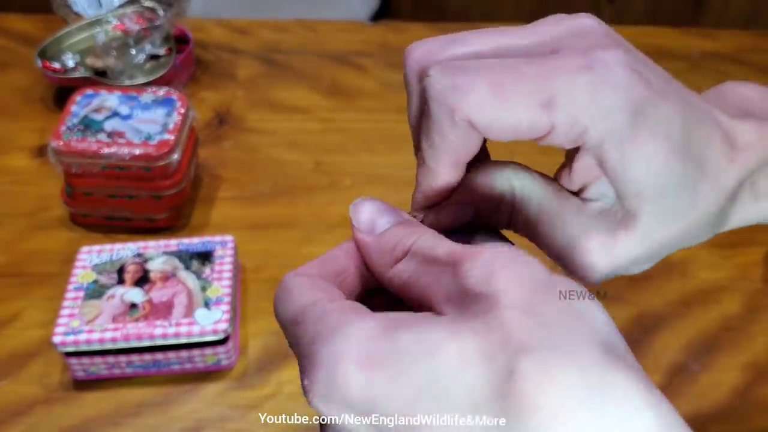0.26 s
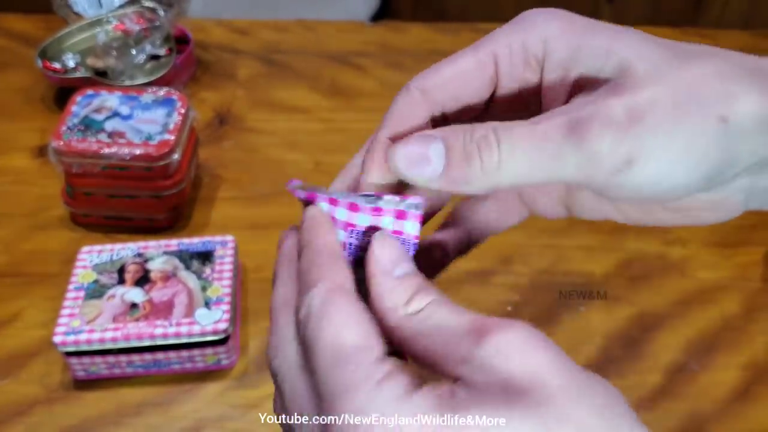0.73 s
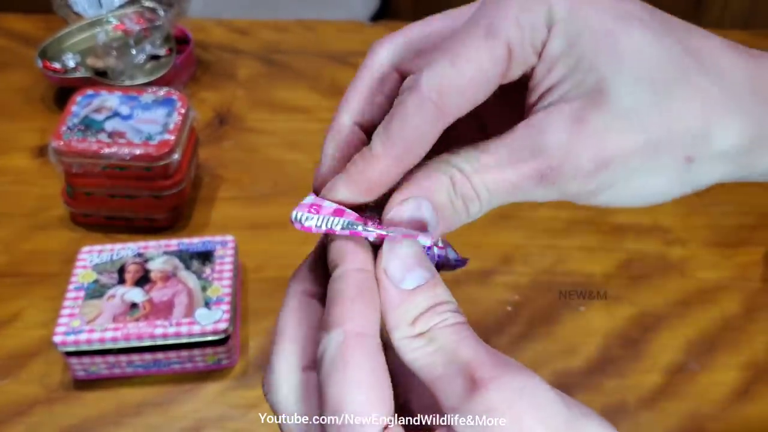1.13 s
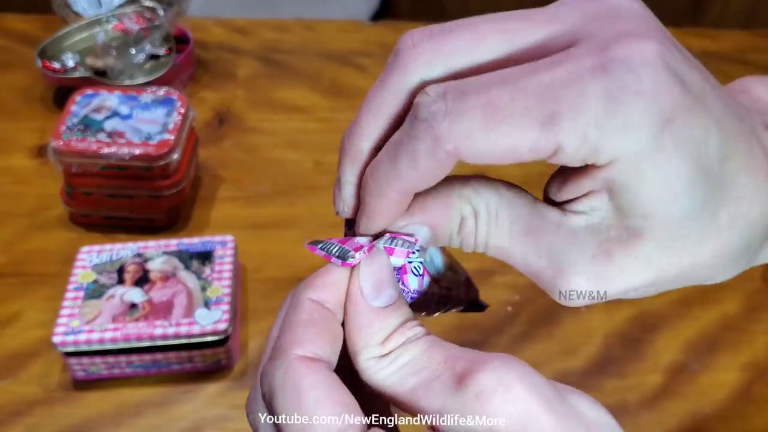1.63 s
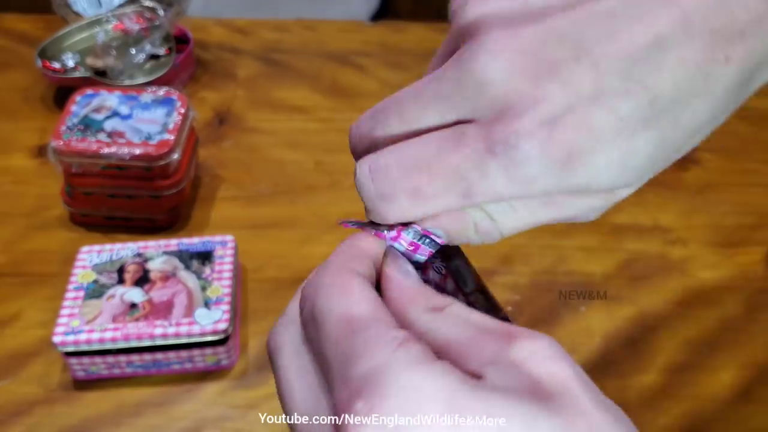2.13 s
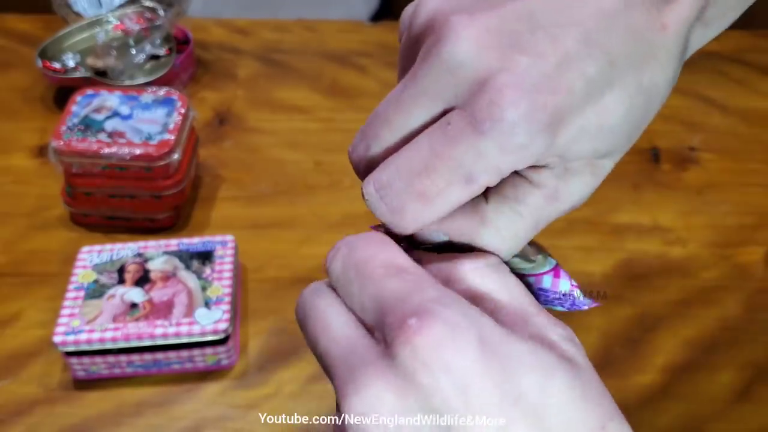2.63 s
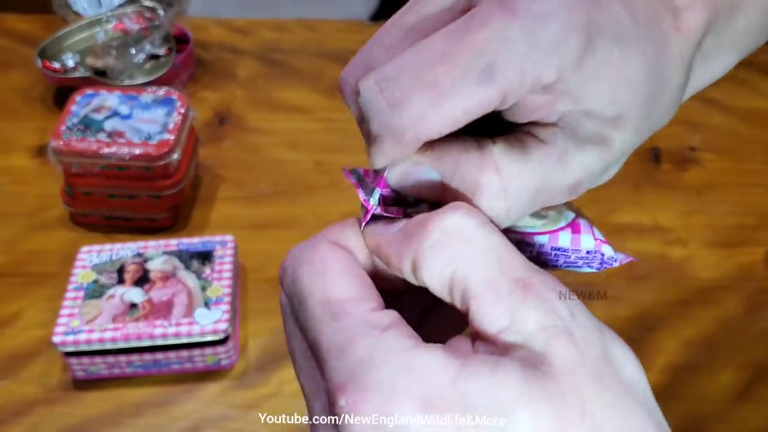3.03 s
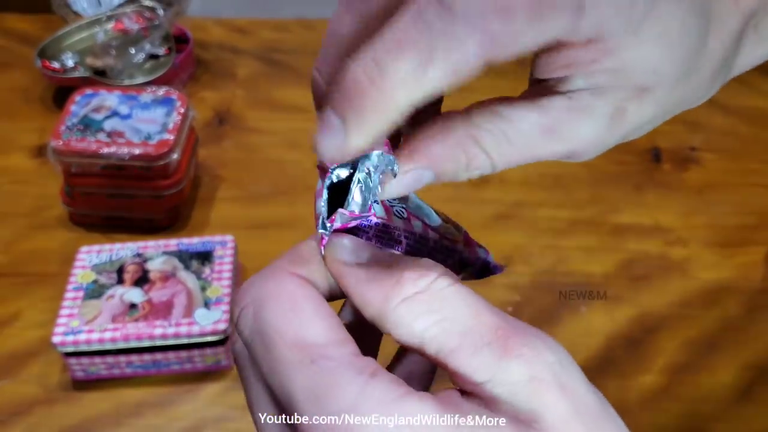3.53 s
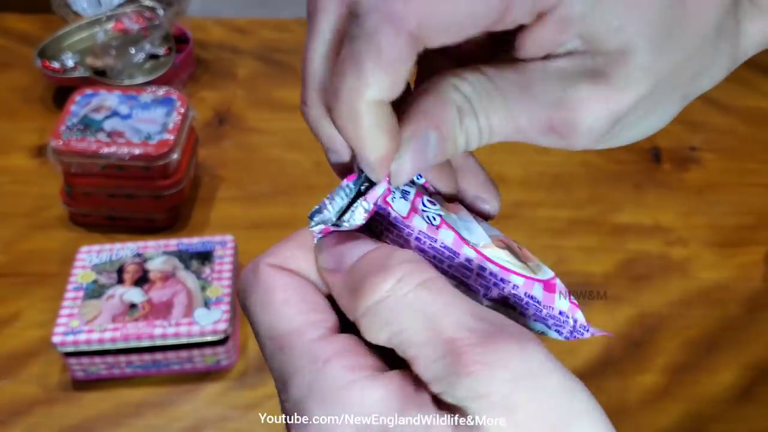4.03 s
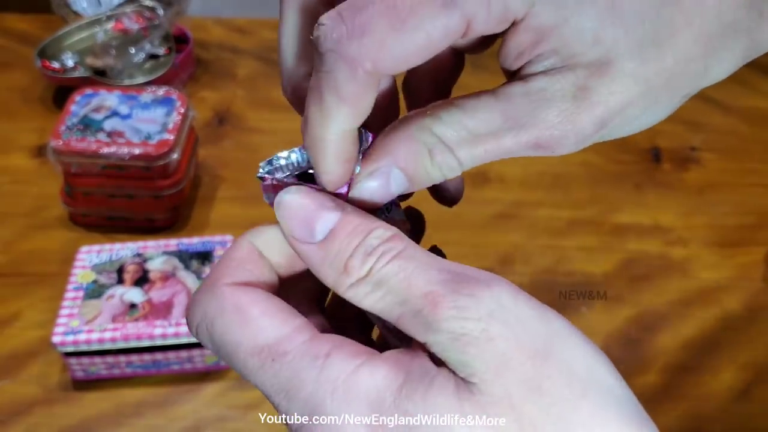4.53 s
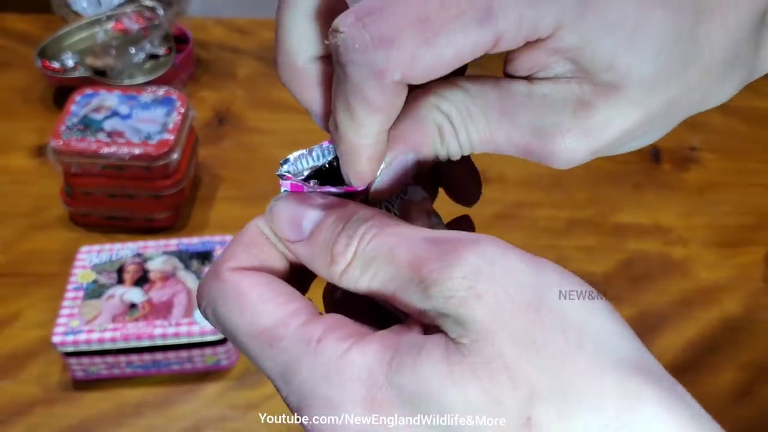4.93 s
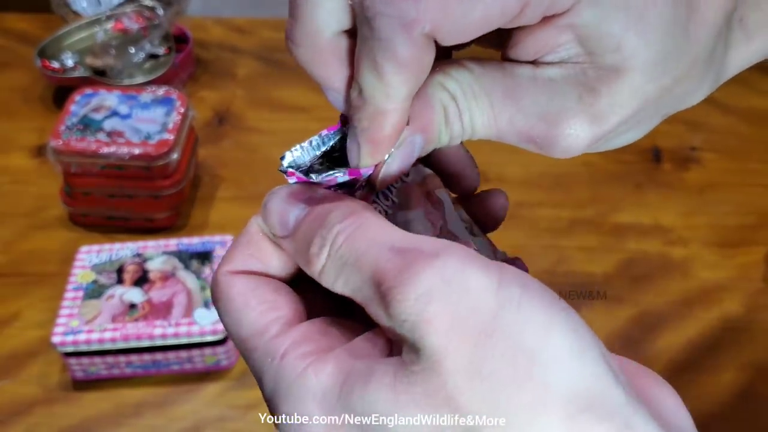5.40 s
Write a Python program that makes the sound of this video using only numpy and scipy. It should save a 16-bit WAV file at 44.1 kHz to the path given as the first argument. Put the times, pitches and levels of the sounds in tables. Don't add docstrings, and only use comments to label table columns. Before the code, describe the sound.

Fingers handle a stiff foil-lined wrapper very close to a stereo microphone, slightly right of centre, in a small quiet room. A sharp snap opens at 0 s, followed by sparse light crackles and a soft press near 0.4. From 0.5 to 1.8 s crisp, dry crinkles come thick and uneven, with papery rustling and fizzing foil between. From 1.9 to 2.7 s they thin into separate pinching snaps with small gaps. A short rip grows near 2.7, a hard snap lands at 3.0, and the loudest dense tear bursts at about 3.1 with a dull thump. Strong crackles continue to 3.3, then sparser ones; a quick peeling flurry runs from 3.9 to 4.2. Lighter picking follows, with a bright snap at 5.2, a tiny seam creak at 5.3 to 5.4 and faint pricks until 5.65. Low mains hum and air noise stay faint; a distant motor drone fades by 4 s.

```python
import sys
import numpy as np
from scipy import signal
from scipy.fft import rfft, irfft, next_fast_len
from scipy.io import wavfile
from scipy.ndimage import uniform_filter1d, map_coordinates

SR = 44100
rng = np.random.default_rng(int(sys.argv[2]) if len(sys.argv) > 2 else 0)


def dump(signal):
    limited = np.clip(np.atleast_2d(signal).T, -1, 1)
    pcm = np.round(limited * 32767).astype(np.int16)
    wavfile.write(sys.argv[1], SR, pcm)


def linear_from_db(decibels):
    return 10 ** (np.asarray(decibels, float) / 20)


N = 249606

# t/s, ring level/dB, body re ring/dB, edge re ring/dB
GRIPPING = [(0.0034, -6.5, -13, -19), (0.0359, -26.5, -14.5, -14), (0.161, -32, -14.5, -11),
            (0.2144, -28.5, -18, -23), (0.2289, -26, -12, -4), (0.2391, -22.5, -22, -8),
            (0.2647, -20.5, -32, -6.5), (0.3861, -31, -10, 6), (0.4119, -26, -3.5, -9),
            (0.427, -9.5, -16, -14.5), (0.478, -28, -4, -30), (0.4941, -28, -7, -6), (0.5028, -17, -21, -4),
            (0.5108, -22.5, 0.5, 5), (0.5316, -13, -39, -7.5), (0.633, -13.5, -18, -13),
            (0.651, -21, -5.5, -3.5), (0.664, -14.5, -31, -10), (0.7165, -22, -33, -6),
            (0.742, -23, -9, -28), (0.7656, -14.5, -18, -15), (0.8003, -16.5, -13, -12),
            (0.852, -11, -18.5, -10), (0.8908, -19, -11.5, -16), (0.9189, -13.5, -17, -9.5),
            (0.9608, -13, -17, -4), (0.9703, -19, -5, -11), (0.9835, -15, -25, -22),
            (0.991, -19.5, -12, 4.5)]
TURNING = [(1.052, -18.5, -18, -6), (1.0714, -18, -14, -15), (1.0894, -10, -19, -11),
           (1.1216, -37.5, -3.5, 13.5), (1.161, -11.5, -23.5, -16), (1.2045, -19, -19, -4),
           (1.265, -24.5, -18, -12), (1.293, -19.5, -28, -33), (1.348, -16.5, -26.5, -17),
           (1.4078, -24.5, -24, -13.5), (1.4194, -31.5, -3, -14), (1.4331, -16.5, -20.5, -14),
           (1.4426, -20.5, -5.5, -11), (1.4587, -18, -13, -29), (1.475, -21, -28, -28),
           (1.532, -14, -35, -26), (1.5422, -14, -47, -5), (1.594, -11, -20.5, -15),
           (1.6218, -13.5, -36, -9.5), (1.6345, -11.5, -17.5, -11.5), (1.6886, -13, -31, -11),
           (1.6942, -10.5, -21.5, -4.5), (1.7762, -44.5, -1, 8.5), (1.784, -23.5, -26, -12)]
PINCHING = [(1.8971, -33, -2, 9.5), (1.926, -18, -2, -8), (1.9726, -17, -13, -32),
            (1.9924, -10, -53, -12.5), (2.0396, -21.5, -14.5, -29), (2.1305, -13, -23, -12),
            (2.166, -18, -8, -29), (2.1811, -16, -26, -27), (2.271, -35.5, -1.5, 11),
            (2.3081, -13, -21, -9.5), (2.315, -25, -33, 1), (2.423, -30, -20, -24),
            (2.4798, -28.5, -34, -18), (2.606, -35.5, -45, -8), (2.713, -20.5, -47, -17),
            (2.7323, -13.5, -15, -41), (2.738, -16.5, -44, -15), (2.7451, -9.5, -18, -23),
            (2.817, -10.5, -51, -8.5), (2.854, -12.5, -19, -6.5), (2.944, -36, -32, 12),
            (2.959, -25, -24, 1), (2.9746, -36, -33, 7.5), (2.989, -40.5, -26, 13), (2.998, -6, -32, -12)]
TEARING = [(3.0588, -22, -25, -6.5), (3.0764, -22, -11, -18), (3.0974, -15, -10, -3), (3.107, -12, -6, -12),
           (3.1166, -5.5, -21, -31), (3.1238, -7.5, -18, -10), (3.1272, -11, -11, -18),
           (3.1526, -7.5, -22, -11.5), (3.1951, -9, -19, -10.5), (3.23, -43.5, -4, 21.5),
           (3.2558, -8, -12.5, -13.5), (3.264, -12.5, -42, -7.5), (3.3368, -16.5, -18, -10),
           (3.394, -14, -27, -12.5), (3.4148, -19, -34, -15), (3.454, -24, -11.5, -6.5),
           (3.473, -19, -28, -8), (3.521, -30.5, -10, -17), (3.6154, -16.5, -6.5, -14.5),
           (3.6853, -25, -7, -26), (3.704, -24.5, 0, -7.5), (3.7903, -24, -10, -7), (3.816, -24, -24, -9.5),
           (3.826, -20, -45, -15), (3.8631, -20.5, -45, -8), (3.8754, -16, -41, -15),
           (3.887, -23.5, -13.5, 6.5)]
PEELING = [(3.913, -23, -4, -27), (3.923, -19, -40, -9), (3.93, -17.5, -26, -6.5),
           (3.9367, -14.5, -14.5, -18), (3.9427, -15.5, -14.5, -12), (3.985, -17.5, -12.5, -11),
           (4.014, -23.5, -6, -4.5), (4.0365, -13, -25, -13.5), (4.0406, -13.5, -19.5, -12),
           (4.051, -17.5, -19, -9), (4.088, -33, -3, -13), (4.1, -23, -6, -5), (4.113, -32, -30, 7),
           (4.124, -26, -0.5, -8), (4.146, -15.5, -19, -9.5), (4.166, -15.5, -7.5, -7.5),
           (4.1716, -14.5, -23, -22), (4.2108, -31, -11, 3.5), (4.2339, -18, -12, -12),
           (4.2684, -33, -6, -20), (4.327, -25.5, -16.5, -15), (4.3536, -27, -13, -16),
           (4.3648, -27.5, -21, -16), (4.4362, -22.5, -11.5, -8.5), (4.5122, -36.5, -2, -20),
           (4.5522, -23.5, -16, -7.5), (4.6137, -26.5, -7.5, -11)]
PICKING = [(4.651, -22, -26, -12), (4.6791, -18, -15, -10), (4.6848, -28, 2, 10.5), (4.7316, -31, -5.5, 2),
           (4.748, -37, -20, 4), (4.7596, -23.5, -7, -24), (4.764, -35, -22, 2), (4.794, -23.5, -38, 1.5),
           (4.9046, -27.5, -7, -6), (4.946, -24, -21, -12), (4.9652, -27.5, -3, -33),
           (4.9826, -37.5, -18, 1.5), (4.989, -37.5, -3.5, 5), (5.0762, -44.5, -18, 14),
           (5.09, -26.5, -11, 0), (5.1311, -21, -16, -3.5), (5.1646, -20, -10.5, -9),
           (5.2073, -37.5, 6, -12), (5.221, -8, -19, -8), (5.238, -21, -32, -21), (5.2831, -15, -5.5, -6.5),
           (5.321, -30, -11, -10), (5.475, -25.5, -17.5, -10), (5.5932, -42.5, -2.5, 10.5),
           (5.629, -32, 1, -5), (5.6463, -25, -10.5, -27)]
RING_PITCH_HZ = [1910, 3500, 4050, 4360, 2703, 4550, 2920, 3940, 3940, 3170, 4030, 2920, 2940, 2770, 3250,
                 3300, 1600, 3780, 3530, 3570, 3200, 1930, 3960, 1930, 3380, 3240, 1730, 3200, 3160, 3040,
                 2680, 3450, 3280, 3400, 3350, 3250, 3570, 3470, 3340, 3730, 3500, 3530, 3340, 4440, 3700,
                 3600, 3270, 3730, 3790, 2950, 4640, 3420, 3660, 3100, 990, 3620, 3350, 3280, 3320, 1650,
                 3160, 2980, 4600, 2520, 4240, 3220, 3680, 4200, 3600, 3140, 3600, 4130, 2760, 4220, 4160,
                 4130, 4100, 3000, 4440, 3400, 3570, 3770, 4230, 2310, 2900, 3700, 3170, 3290, 4060, 3080,
                 4500, 4160, 4180, 3570, 3430, 3060, 1220, 4140, 1340, 1740, 3000, 2860, 3040, 3360, 3670,
                 1170, 3830, 4470, 4010, 3270, 4030, 4160, 3930, 3600, 2980, 1740, 1320, 4450, 1230, 3200,
                 1650, 2520, 3340, 3190, 3750, 3830, 3470, 3730, 3000, 1510, 2990, 3270, 3360, 3430, 2520,
                 4060, 3680, 3290, 2860, 3600, 1360, 2170, 900, 4010, 3900, 3790, 3510, 2200, 2150, 1420,
                 4010, 3190, 2030, 3340, 2670, 3900, 1460, 3180]
# low f/Hz, high f/Hz, t60/s
FILM_RANGES = [
    (700, 1774, 0.0095),
    (2430, 4710, 0.0063),
    (5250, 16250, .0115),
]
# start t/s, end t/s, slip rate/Hz
SEAM_CREAK = (5.3288, 5.434, 113)
PRICKS_S = [5.4935, 5.521, 5.5388, 5.542, 5.563, 5.576]
# full-pressure t/s, hold/s, rustle level/dB, edge re rustle/dB
SQUEEZES = [(0, 0.0059, -41.5, 7.5), (0.264, 0.019, -48.5, 5), (0.394, .16, -35, -6.5),
            (0.642, 0.0079, -34, -29), (0.763, 0.013, -30.5, -8), (0.967, .01, -33, -2),
            (1.065, 0.0073, -35.5, -7), (1.207, 0.051, -39.5, 1.5), (1.434, 0.2, -39.5, -4.5),
            (1.914, 0.16, -41.5, 4), (2.172, 0.0082, -35.5, 2), (2.33, 0.004, -36, 0),
            (2.467, 0.038, -47, 6), (2.759, 0.039, -43.5, 12), (2.842, .18, -42.5, 1.5),
            (3.123, 0.0097, -25, -1.5), (3.206, 0.26, -44, -3), (3.632, 0.13, -50, -3),
            (3.926, 0.045, -46, -20), (4.373, 0.009, -48.5, -4.5), (4.658, .13, -38.5, -17),
            (5.002, 0.0043, -46, 1.5), (5.219, 0.11, -50.5, -30), (5.384, 0.11, -56.5, 11.5),
            (5.65, 0.015, -42, 8.5)]
# start t/s, end t/s, start level/dB, end level/dB, edge re ring/dB
RIPS = [
    (2.681, 2.733, -62.5, -35, 0.5),
    (3.101, 3.129, -27, -34, -0.5),
]
# t/s, ring level/dB, ring f/Hz, edge re ring/dB
EARLY_TICKS = [(0.289, -28.5, 3870, -6), (0.377, -27, 3140, -19), (0.4031, -25, 3360, -12),
               (0.408, -23, 3380, -0.5), (0.476, -45, 3250, -19), (0.5493, -25, 3250, -10),
               (0.5548, -23, 3430, -10), (0.605, -55, 3250, -21), (0.6406, -23, 4100, -10),
               (0.7015, -23.5, 3900, -14), (0.7687, -14.5, 3480, -12), (0.7782, -24.5, 1920, -2),
               (0.831, -32, 4070, -3), (0.9778, -21.5, 1570, -30), (1.0985, -36, 3060, 7),
               (1.183, -32, 3210, -18), (1.198, -39, 3700, -16), (1.2014, -37, 4010, -4),
               (1.222, -31, 2610, -16), (1.2276, -25, 3160, -28), (1.2574, -45.5, 3980, 6.5),
               (1.3006, -27, 3320, -8), (1.453, -24.5, 4800, -6), (1.5792, -19.5, 4310, -6.5),
               (1.61, -33, 3640, 4), (1.645, -18.5, 4070, -4.5), (1.8717, -39, 5150, -9),
               (1.9135, -25.5, 3400, -26), (1.9491, -25, 3230, -6), (1.9641, -20.5, 4200, -19),
               (2.082, -31.5, 3340, -22), (2.1366, -31, 4290, -1), (2.1883, -30, 2440, -1),
               (2.3448, -30, 1420, -19), (2.35, -41, 3420, -2), (2.704, -39, 4130, 3)]
LATE_TICKS = [(2.7702, -25, 3830, -14), (2.797, -37, 3800, -9), (2.8681, -31, 3960, -9),
              (2.8743, -30.5, 3940, 2.5), (3.0021, -38, 3760, 8), (3.0097, -38.5, 4130, 11),
              (3.094, -33, 3800, 10), (3.1103, -20, 2500, -1), (3.1225, -8, 1900, -15),
              (3.0676, -31.5, 2230, -4), (3.1786, -19, 1660, -11), (3.2126, -32, 3620, -1),
              (3.247, -37, 3400, -2), (3.275, -40, 4030, 4), (3.2818, -40, 2820, -17),
              (3.2986, -26.5, 1700, -8), (3.376, -27, 970, -27), (3.3955, -21, 790, -27),
              (3.4628, -31, 1120, -24), (3.5008, -30, 3420, -33), (3.5099, -29, 950, -25),
              (3.594, -38, 3160, -22), (3.7253, -27.5, 3300, -14), (3.8985, -41, 3260, 13),
              (3.9092, -33, 4090, -4), (3.9692, -32, 2970, -17), (3.9768, -34, 3230, -7),
              (4.135, -29.5, 5400, 7.5), (4.224, -26.5, 3380, -20), (4.5802, -33.5, 3430, -19),
              (4.6477, -31, 3420, -1), (4.715, -38, 1280, -16), (5.0082, -33, 2750, -10),
              (5.1606, -28.5, 1210, -7), (5.1736, -39, 1790, 3), (5.3275, -32, 3020, -16),
              (5.393, -44, 3400, 8), (5.4185, -31, 1680, -9)]
# t/s, hold/s, level/dB, centre f/Hz
TUGS = [
    (.398, 0.15, -48.5, 360),
    (.645, 0.028, -45, 322),
    (.766, 0.01, -39, 306),
    (.87, 0.037, -51, 340),
    (1.925, 0.009, -42.5, 447),
    (3.095, 0.0094, -40, 90),
    (3.098, 0.025, -39.5, 333),
]
# f/Hz, t60/s
ROOM_T60 = [(200, 0.3), (1000, 0.25), (3000, 0.18), (8000, 0.21), (15000, 0.059)]
# f/Hz, level/dB rms
HUM_LINES = [(120, -60.5), (240, -67.5), (733, -74)]
# t/s, 57 Hz line level/dB, air noise level/dB
MOTOR_DRIFT = [
    (0, -82, -9),
    (.6, -70, -7.5),
    (1, -61.5, -7),
    (3.3, -63.5, -7.5),
    (4, -89, -6.5),
    (5.66, -80, -8.5),
]
# f/Hz, density/dB per Hz
AIR_SPECTRUM = [(15, -28), (40, -18), (55, -4.5), (100, -3), (160, -8.5), (330, -7), (520, -19.5),
                (800, -20), (1050, -22), (3600, -38), (7500, -46), (16000, -30)]
# f/Hz, correlation
AIR_ALIKE = [(60, 0.96), (300, 0.69), (1500, 0.084), (8000, .1)]
# f/Hz, gain/dB
MIC_COLOUR = [(300, -2.5), (1500, 0), (3300, 7.5), (4500, 4.5), (5200, -0.5), (7500, -1), (9000, 3.5),
              (15000, 1)]
# f/Hz, gain/dB
PORT_LEAN = [(250, -1.5), (1000, 2), (3000, 1.8), (8000, -0.2)]

SNAP_RISE_S = 0.002
PRESS_DB_PER_S, LET_GO_DB_PER_S = 318.5, 254


def along(points, hz):
    f, v = np.transpose(points)
    return np.interp(np.log(hz + 1), np.log(f + 1), v)


def wobble(rate_hz):
    knots = rng.standard_normal(int(N * rate_hz / SR) + 4)
    return map_coordinates(knots, [np.arange(N) * rate_hz / SR])


def filtered(x, response):
    size = next_fast_len(N + 8192)
    return irfft(rfft(x, size) * response(np.fft.rfftfreq(size, 1 / SR)), size)[..., :N]


def causal(gain):
    cep = irfft(np.log(gain + 1e-6))
    cep[1:len(cep) // 2] *= 2
    cep[len(cep) // 2 + 1:] = 0
    return np.exp(rfft(cep))


def buckle(s, levels_db, top_hz, rise_s, alike, lag_s=0.00004):
    size = 512
    start = size // 4
    t, hz = (np.arange(size) - start) / SR, np.fft.rfftfreq(size, 1 / SR) + 1
    g = rng.standard_normal((len(s), 5))
    burst = rng.standard_normal((2, len(s), size))
    burst[0, :, start] += 5 * np.sign(g[:, 1])
    top, width = top_hz[:, None], 0.32 * top_hz[:, None]
    ring = 1 + 2.43 * 1j * hz * width / (top ** 2 - hz ** 2 + 1j * hz * width)
    ripple = np.cos(hz / 1100 * linear_from_db(2 * g[:, 3:4]) + 6 * g[:, 4:])
    ring *= linear_from_db(5.5 * ripple * (hz > 3500))
    turn = np.arccos(np.clip(alike, 0.01, 1) ** np.minimum(hz / 8000, 1)) / 2
    lag = np.exp(1j * np.pi * hz * lag_s * (1 + 0.85 * g[:, 2:3]))
    rise_db = np.maximum(60 * t / rise_s, -19 + 60 * t / 0.045)
    out = np.zeros((2, len(s), size))
    for k, ((low, high, t60), db) in enumerate(zip(FILM_RANGES, levels_db)):
        spread_db = 2.55 * g[:, 0:1] + 2.5 * g[:, 1:2] * (k > 1)
        fall_db = -60 * t / (t60 * linear_from_db(spread_db))
        shape = linear_from_db(np.minimum(fall_db, rise_db))
        band = ring * causal(1 / np.sqrt((1 + (low / hz) ** 5.75) * (1 + (hz / high) ** 12)))
        mid, side = rfft(burst * shape) * band * [[np.cos(turn)], [np.sin(turn)]]
        pair = irfft(np.array([(mid + side) * lag, (mid - side) / lag]), size)
        power = uniform_filter1d((pair ** 2).mean(0), size=44, axis=1).max(1)
        out += pair * (linear_from_db(db) / np.sqrt(2 * power))[:, None]
    where = (np.round(s * SR).astype(int)[:, None] + np.arange(size)).ravel()
    return np.array([np.bincount(where, v.ravel(), N + size)[start:][:N] for v in out])


def snaps():
    creases = GRIPPING + TURNING + PINCHING + TEARING + PEELING + PICKING
    s, db, body, edge = np.transpose(creases)
    levels = [db + body + 0.5, db - 9.0, db + edge + 0.5]
    run_s = 0.0005
    return buckle(s + run_s, levels, np.array(RING_PITCH_HZ), rise_s=SNAP_RISE_S, alike=0.39)


def creak():
    start, end, rate_hz = SEAM_CREAK
    s = np.r_[np.arange(start, end, 1 / rate_hz), PRICKS_S]
    db = -47 + 1.5 * rng.standard_normal(len(s)) - 5 * (s > end)
    levels = [db - 9 * (s > end), db, db + 6.5]
    return buckle(s, levels, 9500 + 0 * s, rise_s=0.00075, alike=0.14)


def rips():
    rows = []
    for (a, b, *rest), count in zip(RIPS, [50, 45]):
        rows.append(np.c_[rng.uniform(a, b, count), np.tile([a, b, *rest], (count, 1))])
    s, start, end, from_db, to_db, edge_db = np.vstack(rows).T
    chance = rng.standard_normal((len(s), 4))
    db = from_db + (to_db - from_db) * (s - start) / (end - start) + 3 * chance[:, 0]
    levels = [db - 13.5 + 3 * chance[:, 1], db, db + edge_db + 3 * chance[:, 2]]
    return buckle(s, levels, 3600 * linear_from_db(2.0 * chance[:, 3]), rise_s=2 * SNAP_RISE_S, alike=0.28)


def ticks():
    s, db, hz, edge = np.transpose(EARLY_TICKS + LATE_TICKS)
    slack = np.log2(2200 / hz)
    body_db = db - 6.0 + 9 * np.minimum(slack, 0)
    ring_db = db - 7.0 - 9 * np.maximum(slack, 0)
    return buckle(s, [body_db, ring_db, db + edge + 3.0], hz, rise_s=SNAP_RISE_S, alike=0.12)


def pressure(s):
    at, hold, db, edge_db = np.transpose(SQUEEZES)[:, :, None]
    press_db = PRESS_DB_PER_S * np.maximum(at - s, 0)
    let_go_db = LET_GO_DB_PER_S * np.maximum(s - at - hold, 0)
    each_db = db - press_db - let_go_db
    weight = linear_from_db(each_db)
    return each_db.max(0), (each_db - db).max(0), (weight * edge_db).sum(0) / weight.sum(0)


def rustle():
    t = np.arange(N) / SR
    rate = linear_from_db(6 * wobble(40))
    rate *= linear_from_db(0.35 * np.interp(t, t[::64], pressure(t[::64])[1]))
    s = np.sort(np.interp(rng.random(1500), np.cumsum(rate) / rate.sum(), t))
    work_db, _, bright_db = pressure(s)
    chance = rng.standard_normal((len(s), 4))
    db = work_db - 6.5 + 3.52 * np.minimum(rng.exponential(size=len(s)), 3.0)
    body_db = db - 8.5 - 0.12 * bright_db + 4 * chance[:, 0]
    levels = [body_db, db + 0.39 * chance[:, 1], db + bright_db + 3 * chance[:, 2]]
    top_hz = 3300 * linear_from_db(0.14 * bright_db + 3.6 * chance[:, 3])
    return buckle(s, levels, top_hz, rise_s=2 * SNAP_RISE_S, alike=0.033)


def fizz():
    t = np.arange(N) / SR
    work_db, _, bright_db = pressure(t[::64])
    prickle = rng.standard_normal((2, N)) * linear_from_db(5.1 * wobble(300))
    pair = filtered(prickle, lambda hz: 1 / (1 + (4200 / (hz + 1)) ** 3))
    pair[1] += 0.73 * pair[0]
    return linear_from_db(np.interp(t, t[::64], work_db + 0.5 * bright_db) - 11) * pair


def tugs():
    out, t = np.zeros((2, N + SR)), np.arange(SR // 3) / SR
    hz = np.fft.rfftfreq(len(t), 1 / SR) + 1
    for s, hold, db, centre_hz in TUGS:
        hump = np.exp(-(np.log(hz / centre_hz) / 0.59) ** 2)
        mid, side = irfft(rfft(rng.standard_normal((2, len(t)))) * hump, len(t))
        fade_db = -60 * np.maximum(t - hold, 0) / 0.08
        shape = linear_from_db(db + fade_db) * (1 - np.exp(-t / 0.0024))
        ports = np.array([2.8 * mid + 0.4 * side, mid - 0.5 * side])
        out[:, round(s * SR):][:, :len(t)] += shape * ports / mid.std() / 2
    return out[:, :N]


def room(x, gap_s, wet_db):
    out, step = np.zeros((2, N + SR)), 8192
    size = SR // 2
    for i in range(0, N, step):
        hz, t, z = signal.stft(rng.standard_normal((2, size)), SR, nperseg=256)
        decay = linear_from_db(-60 * t / along(ROOM_T60, hz)[:, None])
        tail = signal.istft(z * decay, SR, nperseg=256)[1][:, :size]
        tail[1] += 0.16 * (tail[0] - 0.5 * tail[1])
        tail *= 1 - np.exp(-(np.arange(size) / SR / gap_s) ** 2)
        answer = signal.fftconvolve(x[None, i:i + step], tail / np.linalg.norm(tail[0]), axes=1)
        out[:, i:i + answer.shape[1]] += answer
    return linear_from_db(wet_db) * out[:, :N]


def hum():
    t = np.arange(N) / SR
    out = np.zeros(N)
    for hz, db in HUM_LINES:
        level = np.sqrt(2) * linear_from_db(db + 0.2 * wobble(4.2))
        out += level * np.sin(2 * np.pi * hz * t + 1.24 * wobble(3.68))
    at, line_db, _ = np.transpose(MOTOR_DRIFT)
    motor = linear_from_db(np.interp(t, at, line_db) + 1.3 * wobble(11.0))
    return out + motor * np.sin(2 * np.pi * 57 * t + 0.5 * wobble(8.5))


def air(level_db):
    def mid_side(hz):
        turn = np.arccos(np.clip(along(AIR_ALIKE, hz), -1, 1)) / 2
        return linear_from_db(along(AIR_SPECTRUM, hz)) * [np.cos(turn), np.sin(turn)]

    mid, side = filtered(rng.standard_normal((2, N)), mid_side)
    pair = np.array([mid + side, mid - side])
    at, _, swell_db = np.transpose(MOTOR_DRIFT)
    return linear_from_db(level_db + np.interp(np.arange(N) / SR, at, swell_db)) * pair / pair.std()


def scene():
    film = snaps() + creak() + rips() + ticks() + rustle() + fizz() + tugs()
    direct = film * linear_from_db([[-0.6], [0.6]])
    return direct + room(film.mean(0), gap_s=0.0026, wet_db=-9) + hum() + air(level_db=-51)


def low_pass(x):
    return signal.sosfilt(signal.butter(12, 17000, fs=SR, output="sos"), x)


def record(dry):
    def microphone(hz):
        gain_db = along(MIC_COLOUR, hz) + along(PORT_LEAN, hz) * [[0.5], [-0.5]]
        return linear_from_db(gain_db) / (1 + (hz / 15870) ** 90)

    rounded = 0.8 * np.tanh(dry / 0.8)
    return low_pass(filtered(rounded, microphone))


dry = scene()
out = record(dry)
dump(out)
```